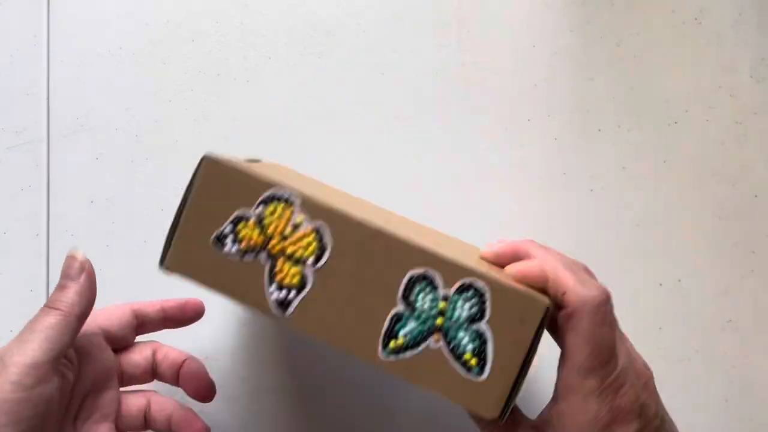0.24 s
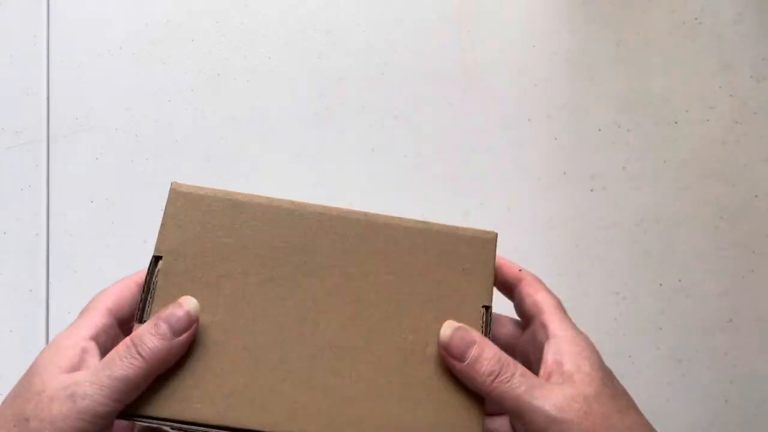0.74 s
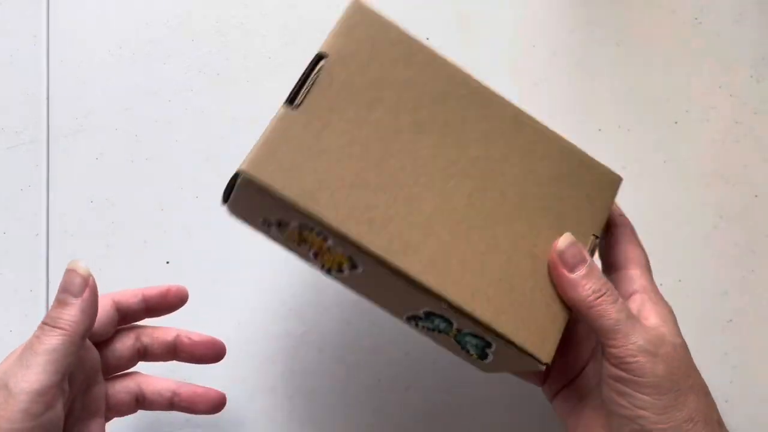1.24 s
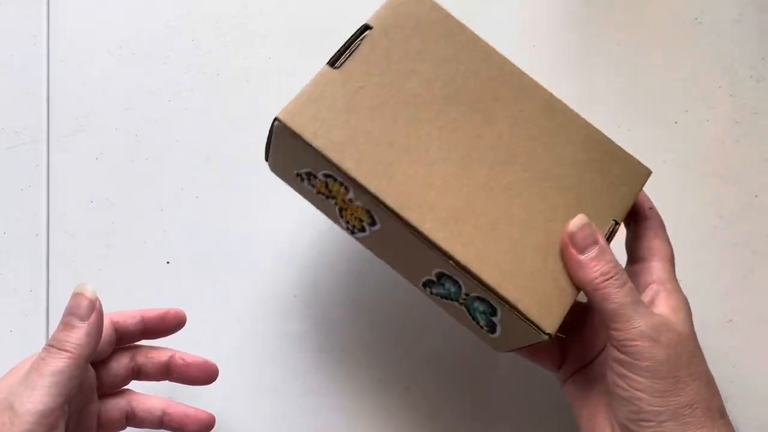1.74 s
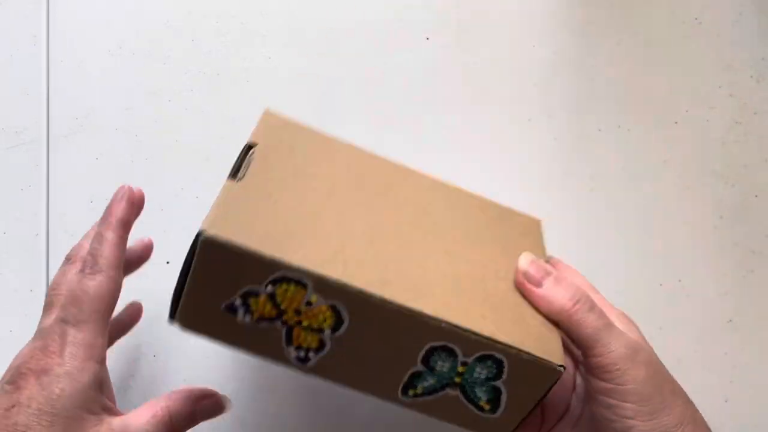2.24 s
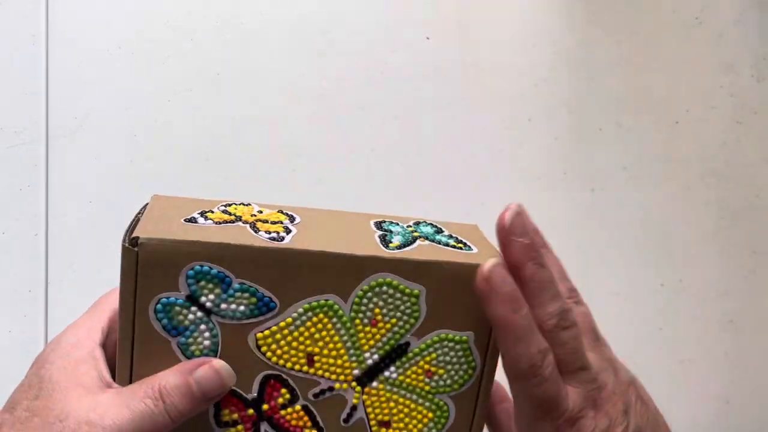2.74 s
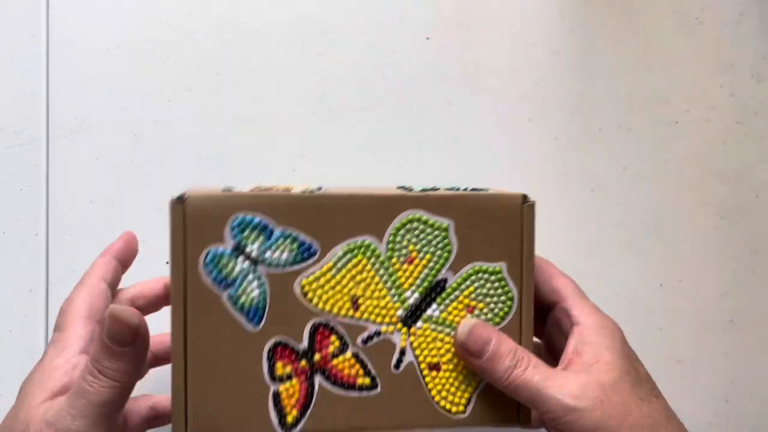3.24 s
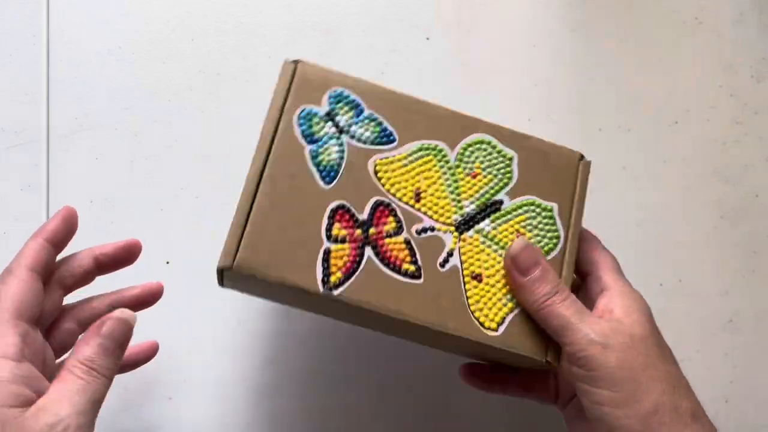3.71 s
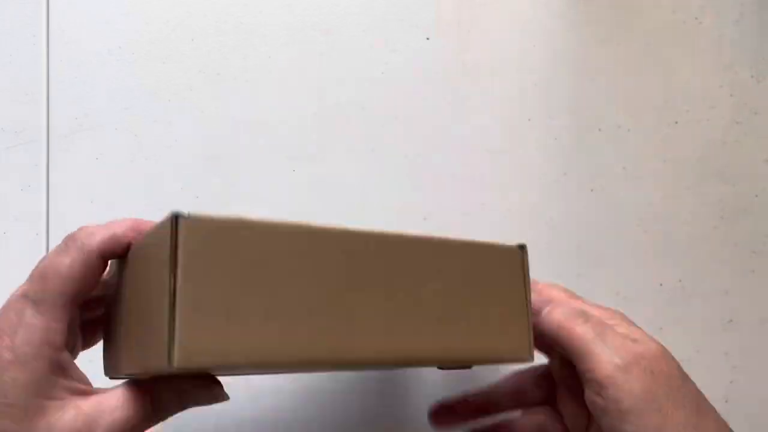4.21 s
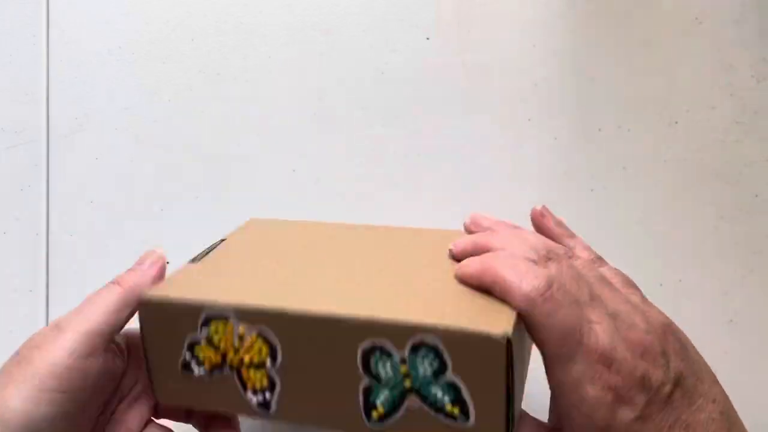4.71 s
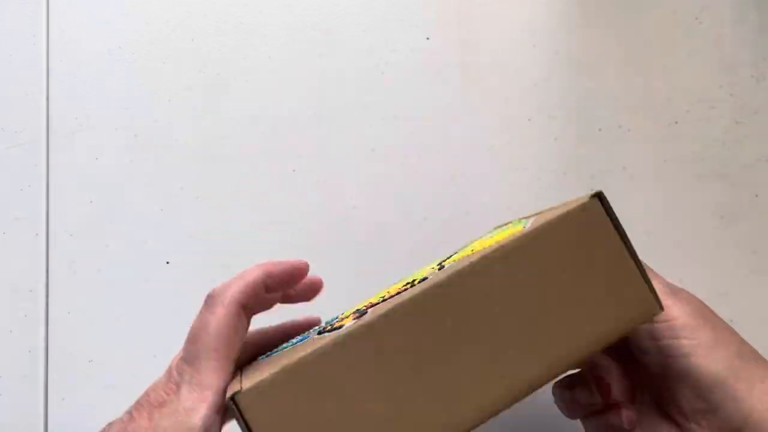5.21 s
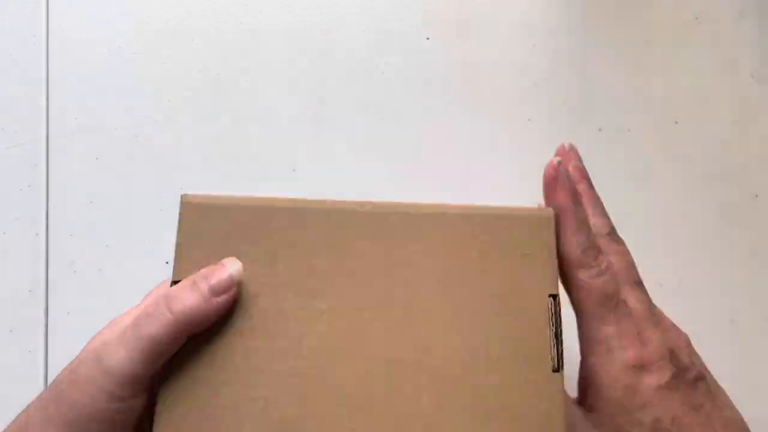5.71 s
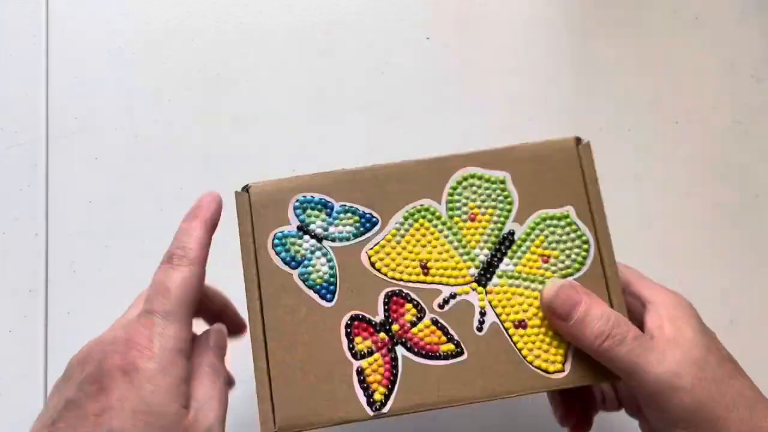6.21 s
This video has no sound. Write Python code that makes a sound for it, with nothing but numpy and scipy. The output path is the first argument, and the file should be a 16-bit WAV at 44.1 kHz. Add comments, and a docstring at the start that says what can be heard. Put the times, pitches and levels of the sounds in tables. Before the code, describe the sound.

Loose tags tumble inside a light cardboard box, hitting its panels in clusters. Each blow gives a short woody tock, a bright tick and a low muffled thud, with finer rattling between. It starts with a knock, thickens into fast clatter, thins briefly, resumes strongly, weakens past five seconds and ends in another burst. Close stereo microphone in a small, quiet, short-echo room.

```python
"""Shaking a box of tags

A small cardboard box full of round tags is shaken and tumbled by hand, close under a two-port microphone.
Single blows, heaps thrown at a wall and loose tags each ring the box panels (decaying tones), leave a
short bright click (fading noise) and make the whole box give once (a low thud).
A small furnished room answers (noise dying at its own speed per frequency) over a faint hush (steady noise).
"""
import sys
import numpy as np
from scipy import signal
from scipy.fft import rfft, irfft, next_fast_len
from scipy.io import wavfile

SR = 44100
rng = np.random.default_rng(int(sys.argv[2]) if len(sys.argv) > 2 else 0)


def waveform_to_disk(signal):
    """Save audio, clipped to [-1, 1], as 16-bit WAV at the path in sys.argv[1]."""
    frames = np.transpose(np.atleast_2d(signal))
    scaled = np.clip(frames, -1, 1) * 32767
    samples = np.round(scaled).astype(np.int16)
    wavfile.write(sys.argv[1], SR, samples)


N = 284886


def amp(db):
    """Gain of a level in dB."""
    return 10 ** (np.asarray(db) / 20)


def unit(x):
    """Scale x to an rms of 1."""
    return x / np.sqrt(np.mean(x ** 2) + 1e-20)


def along(points, hz):
    """Read a curve of (Hz, value) points at hz, on a log frequency axis."""
    point_hz, value = np.transpose(points)
    return np.interp(np.log(hz + 1), np.log(point_hz + 1), value)


def filtered(x, response):
    """Multiply the spectrum of x by a response of frequency."""
    size = next_fast_len(N + SR // 2)
    hz = np.fft.rfftfreq(size, 1 / SR)
    return irfft(rfft(x, size) * response(hz), size)[..., :N]


def train(s, size):
    """Impulses of the given sizes at times s."""
    sample = np.clip(np.round(s * SR).astype(int), 0, N - 1)
    return np.bincount(sample, size, N)


def uneven(shape, scatter_db):
    """Random level offsets in dB: most are moderate, with a long tail of much weaker blows."""
    return scatter_db * np.log(rng.exponential(size=shape) + 0.015)


def shake(s):
    """How the loose tags move at times s: their level, pitch and click, drawn straight between the table rows."""
    # loose tags between landings: start_s [s], level_db [dB, relative],
    # pitch_hz of the panel they lie on [Hz], click_db above the panel [dB]
    shaking = [(0.0, -26.5, 930, -21.5), (0.27, -22, 1056, -16), (0.5, -29, 830, -19), (0.63, -41, 880, -9),
               (0.85, -24.5, 834, -15.5), (1.19, -23.5, 1136, -14.5), (2.07, -27.5, 1020, -12),
               (2.401, -46, 870, -2.5), (2.701, -28.5, 880, -20), (2.88, -41, 890, -22.5),
               (3.06, -34.5, 955, -14.5), (3.38, -20.5, 917, -14.5), (4.5, -28, 894, -17.5),
               (4.62, -14.5, 1020, -11.5), (5.15, -21, 860, -16.5), (5.3, -36.5, 820, -11),
               (5.619, -37.5, 1080, -17), (5.798, -19, 1050, -9.5), (6.14, -24, 814, -11.5),
               (6.46, -18.5, 850, -13.5)]
    start_s, *columns = np.transpose(shaking)
    return [np.interp(s, start_s, column) for column in columns]


def hush(level_db):
    """The steady murmur of a quiet room: shaped noise, mostly shared by both ports."""
    # tone of the murmur: pitch_hz [Hz], level_db [dB per Hz, relative]
    murmur = [(25, 3), (60, 17), (130, 6), (300, 3.5), (1000, -35), (3000, -24), (16000, -29)]
    noise = rng.standard_normal(N) + .3 * rng.standard_normal((2, N))
    return amp(level_db) * unit(filtered(noise, lambda hz: amp(along(murmur, hz))))


def room(x, own):
    """Each frequency of the room's answer dies at its own speed; the ports hear it nearly alike."""
    # time to die away by 60 dB: pitch_hz [Hz], t60_s [s]
    decay = [(150, 0.4), (450, 0.24), (1000, 0.18), (4000, 0.24)]
    hz, t, spectrum = signal.stft(rng.standard_normal((2, SR // 2)), SR, nperseg=256)
    fade = amp(-60 * t / along(decay, hz)[:, None])
    both, apart = signal.istft(spectrum * fade, SR, nperseg=256)[1]
    tail = np.array([both + own * apart, both - own * apart])
    tail = tail / np.linalg.norm(tail[0])
    late = np.pad(x, ((0, 0), (260, 0)))  # the answer starts 260 samples (6 ms) after the direct sound
    return signal.fftconvolve(late, tail, axes=1)[:, :N]


def tumble(spread_db, scatter_db, trim_db, count):
    """Loose tags slide and knock anywhere in the box, following the shaking."""
    # shaken less than all_move_db, ever fewer tags move, down to the share fewest
    all_move_db, fewest = -36, .3
    s = rng.uniform(0, N / SR, count)
    level_db, pitch, click_db = shake(s)
    pitch = pitch * amp(spread_db * rng.standard_normal(count))
    moving_share = np.maximum(amp(level_db - all_move_db), fewest)
    still = rng.uniform(size=count) > moving_share
    level_db = np.where(still, -np.inf, level_db)
    level_db = level_db + trim_db + uneven(count, scatter_db)
    click_db = click_db + 3 * rng.standard_normal(count)
    return np.transpose([s, level_db, pitch, click_db])


def landings(spread_db, scatter_db, trim_db, count):
    """Each landing is a swarm of blows on one wall, densest and strongest around its middle."""
    # heaps of tags thrown against a wall: middle_s [s], length_s [s],
    # level_db [dB, relative], pitch_hz of the panel struck [Hz]
    heaps = [(0.01, 0.042, -13, 975), (0.177, 0.13, -16, 1105), (0.398, 0.097, -19, 986),
             (0.831, 0.064, -26, 736), (0.936, 0.071, -20.5, 1390), (1.138, 0.092, -16, 1190),
             (1.286, 0.094, -23.5, 776), (1.362, 0.04, -10, 1240), (1.479, 0.035, -11, 765),
             (1.564, 0.06, -11, 1140), (1.714, 0.038, -19.5, 920), (1.797, 0.063, -17, 950),
             (2.016, 0.095, -14.5, 1040), (2.21, 0.079, -15, 461), (2.646, 0.055, -9, 847),
             (2.755, 0.031, -21.5, 796), (3.02, 0.048, -30.5, 840), (3.243, 0.12, -18, 850),
             (3.387, 0.066, -13, 810), (3.477, 0.079, -14, 1070), (3.588, 0.05, -10.5, 710),
             (3.788, 0.051, -11, 836), (3.95, 0.074, -11.5, 943), (4.293, 0.051, -13, 1033),
             (4.676, 0.046, -17.5, 990), (4.794, 0.04, -9.5, 990), (5.14, 0.11, -11.5, 877),
             (5.92, 0.11, -25, 950), (6.05, 0.076, -15, 416), (6.43, 0.065, -16, 890)]
    heap_click_db = 3  # a heap clicks like the loose tags, this much more
    click_db_per_octave = 2  # and brighter on a higher, stiffer panel
    pile_up_db = 0.13  # a landing swells towards its end (dB per spread of arrival)
    middle, length, level_db, pitch = np.transpose(heaps)[:, :, None]
    click_db = shake(middle)[-1] + heap_click_db + click_db_per_octave * np.log2(pitch / 1000)
    luck = rng.standard_normal((len(heaps), count, 3))
    arrival = luck[..., 0]
    s = middle + .6 * length * np.tanh(.6 * arrival)
    s = s + .12 * length * np.clip(arrival - 1, 0, None)  # stragglers settle late
    # a longer landing is made of heavier blows, further apart
    thin_db = 10 * np.log10(np.abs(length) / 0.06)
    size_db = level_db + trim_db + thin_db
    size_db = size_db - 2.23 * arrival ** 2 + pile_up_db * arrival + uneven(s.shape, scatter_db)
    rows = [s, size_db, pitch * amp(spread_db * luck[..., 1]), click_db + 3 * luck[..., 2]]
    return np.reshape(rows, (len(rows), -1)).T


def slaps():
    """A tag's edge touches just before it slaps flat, and it rebounds after, at uneven spacing."""
    # single blows: start_s [s], level_db [dB, relative],
    # pitch_hz of the panel struck [Hz], click_db above the panel [dB]
    single_blows = [(0.002, -4.5, 910, -27), (0.123, -21, 850, -19), (0.143, -11, 1280, -13.5),
                    (0.173, -8, 1195, -22), (0.319, -15, 465, -12), (0.395, -13, 492, -11.5),
                    (0.425, -11, 1184, -6.5), (0.485, -20.5, 637, 6), (0.816, -17.5, 725, -24),
                    (0.832, -20.5, 732, -1), (0.918, -6, 1177, -6), (0.928, -13, 1280, 1.5),
                    (0.951, -19, 1500, 6), (0.958, -1.5, 1230, -16.5), (1.037, -7, 1690, -7.5),
                    (1.052, -6.5, 758, -16), (1.102, -9.5, 1160, -15), (1.124, -7.5, 1110, -9),
                    (1.137, -6.5, 1110, -8), (1.156, -8, 1160, -2.5), (1.235, -10.5, 743, -2.5),
                    (1.249, -13, 812, -2.5), (1.273, -7, 756, -16), (1.295, -17.5, 450, -31.5),
                    (1.338, -9, 1120, -2.5), (1.365, -9, 1130, -12), (1.378, -8, 1122, -10),
                    (1.464, -12, 743, 1.5), (1.474, -7.5, 1420, -15.5), (1.504, -12.5, 813, -2.5),
                    (1.541, -12, 1110, -15.5), (1.578, -7.5, 504, 2), (1.588, -10, 1180, 6.5),
                    (1.693, -16.5, 718, -7), (1.703, -11.5, 768, -2.5), (1.768, -10.5, 1020, -10.5),
                    (1.795, -6.5, 1210, 0), (1.807, -6, 1080, -11.5), (1.895, -26, 750, -10),
                    (1.905, -16.5, 755, -8.5), (1.926, -15.5, 760, -17), (1.938, -19, 764, -16),
                    (1.996, -13.5, 1040, 4.5), (2.026, -12, 1110, 1.5), (2.168, -16, 940, 4.5),
                    (2.21, -17.5, 464, -15), (2.23, -16, 1040, -10.5), (2.452, -36, 590, -26),
                    (2.496, -19.5, 424, -1.5), (2.526, -23.5, 403, -18), (2.611, -13, 594, -16.5),
                    (2.625, -19.5, 560, 10), (2.71, -15.5, 926, -13.5), (2.918, -31, 1340, -8.5),
                    (2.937, -26, 1190, -10.5), (2.985, -18.5, 402, -27), (3.142, -17.5, 1485, -9.5),
                    (3.155, -12.5, 1350, -8), (3.19, -6.5, 801, -16), (3.206, -12, 810, -15.5),
                    (3.22, -21, 845, -15), (3.253, -17.5, 824, 4), (3.345, -18, 1240, -11),
                    (3.362, -14, 776, -7), (3.375, -6, 790, -24), (3.388, -8, 827, -8),
                    (3.444, -14, 1520, -2.5), (3.453, -16, 1034, -12), (3.497, -19.5, 1110, 16.5),
                    (3.519, -22, 1170, 8), (3.568, -4.5, 820, -16.5), (3.578, -13, 766, 0.5),
                    (3.589, -4, 745, -14), (3.653, -5.5, 1044, -3.5), (3.677, -13.5, 1040, -1.5),
                    (3.71, -15.5, 1270, 6.5), (3.754, -21, 873, -13), (3.786, -9, 860, -8),
                    (3.882, -18, 990, -6.5), (3.894, -12.5, 1040, -15), (3.934, -12.5, 870, -18),
                    (3.956, -10.5, 1034, -3.5), (3.964, -10.5, 1030, -22), (4.115, -14.5, 860, -20),
                    (4.14, -16.5, 1056, -10), (4.149, -18, 980, 0), (4.163, -11.5, 817, -11),
                    (4.193, -14, 833, -3.5), (4.244, -18, 850, -6), (4.27, -8, 920, -14),
                    (4.357, -11.5, 593, -14.5), (4.416, -15, 1060, -10.5), (4.447, -15, 1077, -14.5),
                    (4.517, -11, 612, -15), (4.591, -11.5, 1130, -16.5), (4.598, -8, 1550, -12),
                    (4.622, -8.5, 980, -9.5), (4.659, -11, 1050, -11.5), (4.697, -11, 1020, -10),
                    (4.787, -23, 1050, 7.5), (4.815, -7, 430, -5), (4.852, -9, 880, -5.5),
                    (4.88, -8.5, 887, -2), (4.915, -14.5, 890, -23), (4.931, -11.5, 860, -16),
                    (4.969, -19, 860, -28), (4.987, -16, 900, -17), (5.002, -12, 906, -21),
                    (5.018, -14.5, 870, -4.5), (5.054, -11, 855, -15), (5.072, -12, 860, -17),
                    (5.097, -12.5, 790, -5), (5.155, -10.5, 1060, -8), (5.25, -17, 1200, -14),
                    (5.378, -24, 343, -14), (5.429, -30, 480, -11), (5.502, -19.5, 360, -31),
                    (5.511, -25, 1050, -22), (5.542, -31.5, 350, -16), (5.659, -22.5, 1110, -18),
                    (5.669, -15.5, 1090, -10), (5.74, -15.5, 1040, -12), (5.763, -9, 993, -3),
                    (5.772, -2.5, 1083, -32), (5.795, -4, 1060, -26), (5.812, -9.5, 1000, -4),
                    (5.82, -8.5, 1030, -24.5), (5.882, -12.5, 1020, -15.5), (5.892, -18, 1020, -22),
                    (5.925, -16.5, 1010, -0.5), (6.008, -19.5, 1070, 0), (6.019, -14, 454, -25.5),
                    (6.038, -7, 408, -13), (6.04, -6.5, 1160, -8.5), (6.057, -21, 427, -30),
                    (6.247, -12, 890, -13), (6.269, -10, 790, -12), (6.306, -12.5, 820, -19),
                    (6.318, -10.5, 900, -16.5), (6.339, -19, 1010, -8.5), (6.352, -16, 930, -16),
                    (6.36, -15.5, 827, -17.5), (6.4, -11, 850, -14), (6.409, -10.5, 820, -8.5),
                    (6.437, -9, 974, -12)]
    edge_s, edge_db = 0.00267, -9  # typical lead; level against the slap
    rebound_s, rebound_db = 0.004534, -11.5  # typical delay; level against the slap
    hits = np.array(single_blows, float)
    luck = rng.uniform(.6, 1.4, (len(hits), 2))

    def moved(s, db):
        """The same blows, shifted in time and level."""
        return hits + np.transpose([s, db + 0 * s, 0 * s, 0 * s])

    edges = moved(-edge_s * luck[:, 0], edge_db)
    rebounds = moved(rebound_s * luck[:, 1], rebound_db)
    return np.vstack([edges, hits, rebounds])


def thuds(blows):
    """The whole box yields to each blow and springs back: one low cycle without a ring, alike at both ports."""
    thud_hz, thud_db, thud_db_per_octave = 340, -14.5, -7.5  # more thud under a low blow
    s, level_db, pitch, _ = blows.T
    push_db = level_db + thud_db + thud_db_per_octave * np.log2(pitch / 1000)
    push = train(s, amp(push_db) * np.sign(rng.standard_normal(len(s))))
    w = 2 * np.pi * thud_hz / SR
    # three equal real poles: the movement dies without ringing
    return signal.lfilter([w * np.e, -w * np.e], np.poly([np.exp(-w)] * 3), push)


def clicks(blows, t60, trim_db, tint_db, own):
    """Tag against tag and wall: a puff of bright noise that dies quickly, tinted anew by each contact."""
    # tone of a click: pitch_hz [Hz], level_db [dB per Hz, relative]
    colour = [(300, -22), (1500, -1), (3500, -3.5), (4300, -9), (8000, -13.5), (10000, -18), (13000, -26),
              (16000, -36)]
    # edges of the bands that each contact tints separately: edge_hz [Hz]
    edges_hz = [0, 2200, 3000, 3900, 4900, 6600, 30000]
    rise_s = 0.00088
    s, level_db, _, click_db = blows.T
    tint = tint_db * rng.standard_normal((len(s), len(edges_hz) - 1))
    rise = np.exp(-1 / SR / rise_s)
    white = rng.standard_normal((2, N))
    out = np.zeros((2, N))
    for k, (lo, hi) in enumerate(zip(edges_hz, edges_hz[1:])):
        both, apart = filtered(white, lambda hz: amp(along(colour, hz)) * (hz >= lo) * (hz < hi))
        # the ports hear the top band more alike
        unlike = 1 if hi <= edges_hz[-2] else .3
        apart = apart * own * unlike
        # the power of all puffs adds up: doubled dB, a short rise, then the decay
        starts = train(s, amp(2 * (level_db + click_db + trim_db + tint[:, k])))
        power = signal.lfilter([1], [1, -amp(-120 / t60 / SR)], starts)
        power = signal.lfilter([1 - rise], [1, -rise], power)
        out += np.sqrt(np.abs(power)) * [both + apart, both - apart]
    return out


def panels(blows, octaves, skirt_db, scatter_db, aim_db, overtone_db, rise_cycles):
    """A blow drives most the modes near the pitch of its panel; each mode beams differently to each port."""
    # ringing modes of the panels: pitch_hz [Hz], level_db [dB, relative]
    modes = [(140, -5), (200, -18), (290, 2.5), (370, 0.5), (450, 4.5), (540, 6), (610, -2.5), (730, 2),
             (860, 3), (945, -1.5), (1035, 3), (1140, 0.5), (1300, 3.5), (1430, 6), (1570, 0.5), (1850, 0),
             (2120, 1), (2900, 0), (3500, 2)]
    ring_s, ring_cycles = 0.033, 23.3  # card is lossy: t60 is the shorter of these two
    overtone_ratio, overtone_per_click = 1.888, 0.74  # a sharper click wakes it more (dB per dB), up to a cap
    third_ratio, third_db = 2.84, -9  # a higher partial: ratio to the panel's tone, level against the overtone
    steady = .3  # the struck panel's own tones scatter only this share as much as the rest
    beam_hz = 496  # modes well under this reach both ports alike
    wider_per_octave_db = 6  # a blow on a large, low panel (under 700 Hz) spreads over more modes
    s, level_db, pitch, click_db = blows.T
    overtone = amp(np.minimum(overtone_db + overtone_per_click * click_db, 0))
    width = octaves * amp(wider_per_octave_db * np.clip(np.log2(700 / pitch), 0, None))
    luck = rng.standard_normal((len(s), len(modes), 3))
    out = np.zeros((2, N))
    for k, (hz, db) in enumerate(modes):
        def near(centre):
            """How strongly a tone at centre drives this mode."""
            return np.exp(-(np.log2(hz / centre) / width) ** 2) * np.sqrt(octaves / width)

        # the panel's lowest tone and its overtones, then a little of everything
        higher = near(overtone_ratio * pitch) - amp(third_db) * near(third_ratio * pitch)
        tones = near(pitch) - overtone * higher
        scatter = scatter_db * luck[:, k, 0]
        share = tones * amp(steady * scatter) + amp(skirt_db + scatter) * np.sign(luck[:, k, 1])
        size = amp(level_db + db) * share * np.sign(luck[:, 0, 0])
        aim = amp(aim_db) * hz / np.hypot(hz, beam_hz) * luck[:, k, 2]
        drive = [train(s, size * (1 + aim * side)) for side in (1, -1)]
        # soft card: the ring swells over a cycle or so before it dies
        t60 = min(ring_s, ring_cycles / hz)
        turn = np.exp(2j * np.pi * hz / SR)
        ring = amp(-60 / t60 / SR)
        rise = np.exp(-hz / SR / rise_cycles)
        poles = np.convolve([1, -ring * turn], [1, -rise * turn])
        out += signal.lfilter([1 - rise], poles, drive).imag
    return out


def scene():
    """Single blows, landing heaps and loose tags, in the room."""
    hits = slaps()
    heaps = landings(spread_db=1.23, scatter_db=2.0, trim_db=-6.5, count=24)
    loose = tumble(spread_db=0.8, scatter_db=2.8, trim_db=-7.5, count=2000)
    small = np.vstack([heaps, loose])
    soft = hits[:, 3] < -15.5  # a blow with less click (dB) lands flat and swells more slowly
    box = panels(hits[~soft], octaves=0.088, skirt_db=-19.0, scatter_db=2.0, aim_db=-10.5,
                 overtone_db=5, rise_cycles=1.31)
    box += panels(hits[soft], octaves=0.13, skirt_db=-23.5, scatter_db=3.5, aim_db=-10.5,
                  overtone_db=6, rise_cycles=1.48)
    box += clicks(hits, t60=0.0085, trim_db=8.5, tint_db=4.5, own=0.49)
    box += panels(small, octaves=0.11, skirt_db=-16, scatter_db=4.0, aim_db=-5.5,
                  overtone_db=0.5, rise_cycles=0.7)
    box += clicks(small, t60=0.027, trim_db=11.5, tint_db=5, own=0.26)
    box += thuds(np.vstack([hits, small]))
    return box + amp(-8.0) * room(box, own=0.042) + hush(level_db=-49.5)


def record(dry):
    """The ports differ in phase and level by frequency; bass is cut, peaks rounded off, the band ends steeply."""
    # how far the left port leads: pitch_hz [Hz], lead_rad [radians]
    port_lead = [(30, 0), (200, .25), (800, .45), (1900, .15), (3400, .95), (4500, .1), (6200, -1),
                 (6700, -3.05), (7900, -3.4), (10300, -6.1), (12100, -6.5), (13400, -9.3)]
    # left port over right: pitch_hz [Hz], level_db [dB]
    port_balance = [(300, 0.5), (450, 0.5), (800, 6.5), (1300, 0.2), (2300, 1.6), (3500, 1.5), (6000, 6.5),
                    (7000, -1)]
    low_cut_hz, top_hz = 130, 15900
    side = np.array([[.5], [-.5]])  # each port takes half of the difference

    def response(hz):
        """Both ports' phase and level, with the bass cut."""
        phase = np.exp(1j * side * along(port_lead, hz))
        level = amp(side * along(port_balance, hz))
        return phase * level * (hz / np.hypot(hz, low_cut_hz)) ** 2

    x = filtered(dry, response)
    x = x / (1 + np.abs(x / .95) ** 4) ** .25  # rounds peaks off below .95
    return filtered(x, lambda hz: hz < top_hz)


dry = scene()
out = record(dry)
waveform_to_disk(out)
```